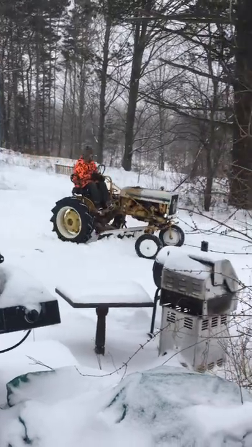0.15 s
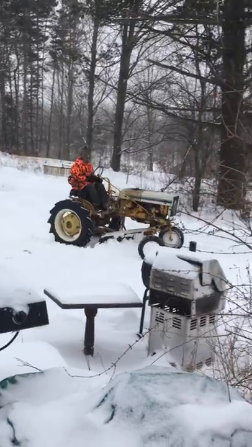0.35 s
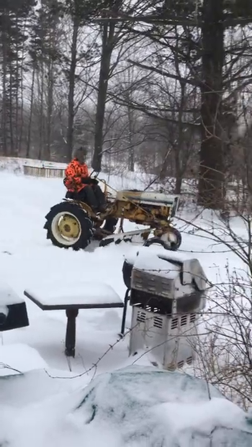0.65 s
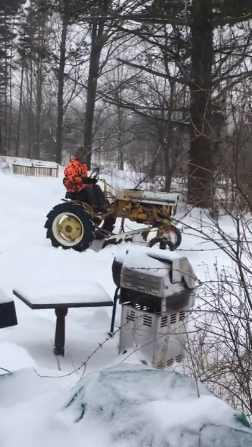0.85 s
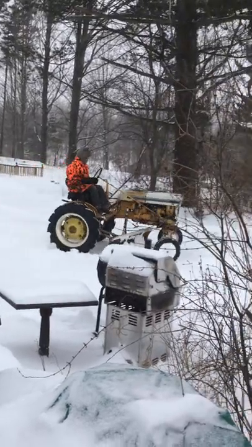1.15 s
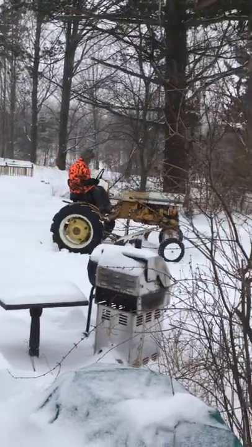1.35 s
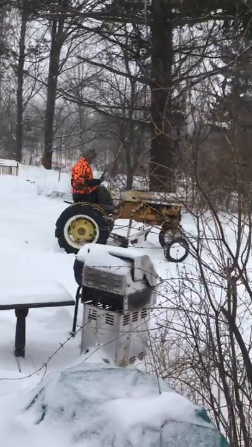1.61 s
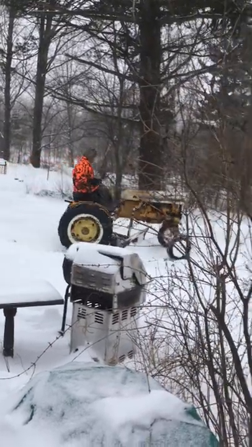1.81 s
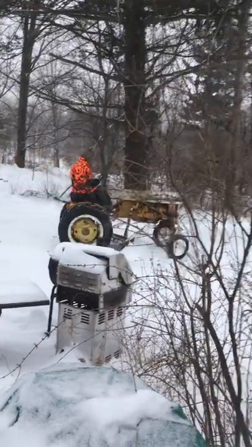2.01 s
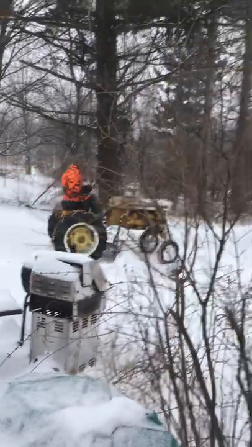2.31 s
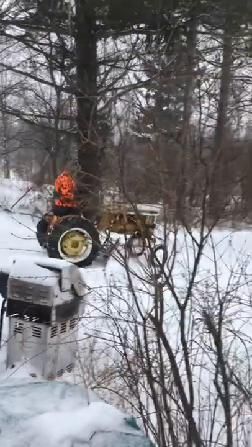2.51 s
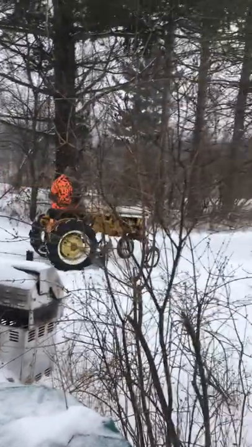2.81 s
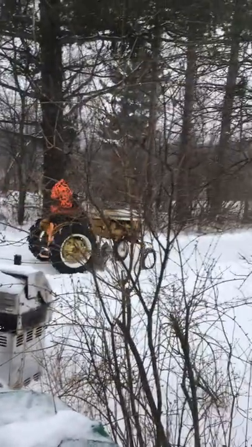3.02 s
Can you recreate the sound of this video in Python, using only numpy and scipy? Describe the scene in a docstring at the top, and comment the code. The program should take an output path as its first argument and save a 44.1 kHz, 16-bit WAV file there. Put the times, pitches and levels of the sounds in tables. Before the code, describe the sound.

An old tractor engine drones low and steady with a rough mid-range roar and faint hiss. Snow crunches softly; near the end a loose panel rattles quickly. Outdoors in a snowy yard, one microphone at some distance.

```python
"""A low engine drone fills a snowy yard: an old four-cylinder tractor drives slowly away, turning its
tail to the microphone. The exhaust is sines on multiples of the engine cycle, with fan sines beside it;
block and tinwork are shaped noise and noisy resonances. Snow crunches under the tyres as puffs of
filtered noise, gears whine as thin sines, and near the end a loose panel knocks in short gritty rings."""
import sys
import numpy as np
from scipy import signal
from scipy.fft import rfft, irfft
from scipy.io import wavfile
from scipy.ndimage import uniform_filter1d

SR = 44100
rng = np.random.default_rng(int(sys.argv[2]) if len(sys.argv) > 2 else 0)


def volts_from_decibels(level):
    """Turn decibel levels (scalar or array-like) into linear amplitude factors."""
    exponent = np.asarray(level, float) / 20
    return 10 ** exponent


def dump(signal):
    """Clip the signal to [-1, 1] and save it as 16-bit WAV at the path in sys.argv[1]."""
    limited = np.clip(np.atleast_2d(signal).T, -1, 1)
    pcm = np.round(limited * 32767).astype(np.int16)
    wavfile.write(sys.argv[1], SR, pcm)


N = 139356
T = np.arange(N) / SR
BLUR_TURNS = 0.0125  # rms phase wander per multiple: cycles are never quite alike
QUICK_HZ = 10  # rattle and flicker are no slower than this


def evened(x):
    """Scales to rms 1."""
    return x / np.sqrt(np.mean(x ** 2) + 1e-20)


def read(points, hz):
    """Reads a spectrum on a log-frequency axis, silent outside its points."""
    point_hz, level_db = np.transpose(points)
    return np.interp(np.log(hz + 1), np.log(point_hz + 1), level_db, -120, -120)


def drive(column, t=T):
    """One column of the drive across the yard, over time."""
    names = ["start_s", "turned_away", "firing_db", "octave_db", "roar_db", "low_mids_db"]
    # the tractor's course and loudness:
    # start_s, turned_away (0-1), firing_db, octave_db, roar_db, low_mids_db
    course = np.array([(0, 0.01, -37, -34, -2, 1), (.85, 0.15, -34.5, -33, -1.5, 0.5),
                       (1.15, 0.35, -35.5, -32.5, -1.5, 3), (1.75, 0.53, -35, -31.5, -0.5, 3.5),
                       (2.1, 0.61, -36.5, -31, -0.5, 3.5), (2.36, 0.63, -37, -30, 0.5, -1),
                       (2.5, 0.84, -37.5, -31.5, 1, 0), (3.16, 0.93, -39.5, -32.5, 1.5, -1.5)])
    return np.interp(t, course[:, 0], course[:, names.index(column)])


def facing(side_db, behind_db, t=T):
    """Blends from the side-on value to the value from behind as the tractor turns away."""
    away = np.clip(drive("turned_away", t), 0, 1)
    return side_db + (behind_db - side_db) * away


def waver(top_hz, low_hz=.7):
    """Random drift of rms 1, a sum of slow sines."""
    t = T[::64]
    slow = np.zeros(len(t))
    for hz in np.geomspace(low_hz, top_hz, num=14):
        slow += np.sin(2 * np.pi * (hz * t + rng.random())) / np.sqrt(hz)
    return np.interp(T, t, evened(slow))


def fuzzy(hz, width_hz, size=N):
    """Noise ringing in one steep resonance, rms 1."""
    radius, t = np.exp(-np.pi * width_hz / SR), np.arange(size) / SR
    noise = rng.standard_normal(size) + 1j * rng.standard_normal(size)
    # a double pole around 0 Hz, then shifted up to the resonance
    narrow = signal.lfilter([1], [1, -2 * radius, radius * radius], noise)
    return evened((narrow * np.exp(2j * np.pi * hz * t)).real)


def burst(rise_s, t60_s):
    """Soft rise, then exponential decay."""
    t = np.arange(SR // 5) / SR
    rise = np.sin(np.pi / 2 * np.minimum(t / rise_s, 1)) ** 2
    return rise * volts_from_decibels(-60 * np.maximum(t - rise_s, 0) / t60_s)


def add(mix, start_s, sound):
    """Mixes a sound in at a time."""
    part = mix[round(start_s * SR):][:len(sound)]
    part += sound[:len(part)]


def tone(turns, rms_db):
    """A sine of random phase at an rms level."""
    return np.sqrt(2) * volts_from_decibels(rms_db) * np.sin(2 * np.pi * (turns + rng.random()))


def crunches():
    """Short bright puffs of crushed snow: the loud ones listed, small ones at random."""
    # loud crunches under the tyres: peak_s, rms_db (at the peak)
    loud = [(.037, -53), (.131, -51), (.285, -50), (.525, -58), (.793, -52), (.88, -57), (1.336, -53),
            (1.81, -58), (2.04, -55), (2.291, -56)]
    # colour of crushed snow: pitch_hz, level_db (relative)
    snow_colour = [(2000, -36), (3200, -13.5), (5310, -1), (7130, -10.5), (10000, -16), (16000, -33)]
    rise_s, t60_s = .008, .14
    small_per_s, small_db, small_range_db = 25, -68, 5.9
    lumps_db = 3  # rms unevenness of each crunch's colour
    shape = burst(rise_s, t60_s)
    hz = np.fft.rfftfreq(len(shape), 1 / SR)
    draws = rng.random((round(small_per_s * N / SR), 2))
    small = [(when * N / SR, small_db + small_range_db * size) for when, size in draws]
    out = np.zeros(N)
    for peak_s, rms_db in list(loud) + small:
        lumps = lumps_db * evened(uniform_filter1d(rng.standard_normal(len(hz)), size=250))
        spectrum = rfft(rng.standard_normal(len(shape))) * volts_from_decibels(read(snow_colour, hz) + lumps)
        grit = evened(irfft(spectrum, len(shape)))
        add(out, max(peak_s - rise_s, 0), volts_from_decibels(rms_db) * shape * grit)
    return out


def whines():
    """Thin gear tones of wavering pitch that swell and fade."""
    # gear whines: start_s, length_s, pitch_hz, rms_db
    gears = [(1.66, .52, 1285, -54), (2.6, .6, 2606, -64), (2.36, .26, 3260, -64), (2.61, .165, 3260, -59)]
    pitch_waver_hz, level_waver_db, edge_s = 4, 1.4, .04
    out = np.zeros(N)
    for start_s, length_s, hz, rms_db in gears:
        edge = np.clip(np.minimum(T - start_s, start_s + length_s - T) / edge_s, 0, 1)
        turns = np.cumsum(hz + pitch_waver_hz * waver(30)) / SR
        out += edge * tone(turns, rms_db + level_waver_db * waver(21.1))
    return out


def knocks():
    """A loose panel swells into a short gritty ring and is damped at once."""
    # knocks of the panel: peak_s, peak_db (of the sine, before grit), pitch_hz
    panel = [(2.648, -42.5, 1590), (2.706, -45.5, 1744), (2.755, -43, 1485), (2.8, -41.5, 1590),
             (2.86, -37.5, 1590), (2.955, -39, 1585), (3.005, -41.5, 1563), (3.058, -35, 1590),
             (3.137, -39.5, 1616)]
    rise_s, t60_s = .02, .09
    grit_share, grit_width_hz = .5, 350  # noise rms against the sine's, and its bandwidth
    shape, out = burst(rise_s, t60_s), np.zeros(N)
    for peak_s, peak_db, hz in panel:
        ring = tone(hz * T[:len(shape)], 0)
        ring += grit_share * fuzzy(hz, grit_width_hz, size=len(shape))
        add(out, peak_s - rise_s, volts_from_decibels(peak_db) / np.sqrt(2) * shape * ring)
    return out


def roar_colour(hz, t):
    """Spectrum of the block's roar, hiss and rumble, turning with the tractor."""
    # mid roar heard from the side: pitch_hz, level_db (relative)
    side = [(195, -60), (215, -5), (294, -5.5), (360, -1), (394, -33), (430, -12), (560, 1), (671, -12),
            (750, -2.5), (850, -12.5), (930, -28.5), (1050, -12.5), (1300, -18), (1600, -10.5),
            (1700, -23.5), (1850, -18), (2060, -27.5), (2230, -21), (2450, -41), (2600, -70)]
    # mid roar heard from behind: pitch_hz, level_db (relative)
    behind = [(195, -55), (215, -1), (294, -5.5), (360, -9), (401, -12), (430, -15), (515, -10.5),
              (640, -13.5), (750, -12), (850, -14), (950, -27.5), (1300, -16), (1560, -17.5), (1900, -18.5),
              (2080, -31), (2230, -26.5), (2600, -66)]
    # treble hiss: pitch_hz, level_db (relative)
    hiss = [(1470, -43), (2500, -2.5), (3350, 0), (3970, -3), (5390, -2.5), (6050, -11), (7170, -14),
            (9600, -15.5), (10500, -21.5), (15700, -23)]
    # low rumble: pitch_hz, level_db (relative)
    rumble = [(20, -50), (42, -33), (58, -12.5), (100, -4.5), (170, -13.5), (215, -66)]
    hiss_db, rumble_db = -26.5, 1  # against the mid roar
    hiss_dulls_db = -3  # at 5 kHz, once fully turned away
    sag = 0.043  # the roar's resonances sink by this share as the tractor turns away
    boom_top_hz = 600  # the low-mid level acts below this
    sunk = hz[:, None] * facing(1, 1 + sag, t)
    colour = volts_from_decibels(facing(read(side, sunk), read(behind, sunk / (1 + sag)), t))
    colour *= volts_from_decibels((hz < boom_top_hz)[:, None] * drive("low_mids_db", t))
    dulling = facing(0, hiss_dulls_db * np.log2(hz / 5000 + 1)[:, None], t)
    colour += volts_from_decibels(read(hiss, hz)[:, None] + hiss_db + dulling)
    colour += volts_from_decibels(read(rumble, hz) + rumble_db)[:, None]
    return colour


def block():
    """Roar of the block: patchy noise laced with thin lingering strands, rms 1."""
    patchy_db, strands_db = .8, 1.5  # rms unevenness
    frames, hz = N // 512 + 5, np.fft.rfftfreq(2048, 1 / SR)
    real, imaginary, patches, strands = rng.standard_normal((frames, 1025, 4)).T
    # smoothed over frequency, then over time: strands are narrow and long, patches broad and short
    strands = evened(uniform_filter1d(uniform_filter1d(strands, size=2, axis=0), size=40, axis=1))
    patches = evened(uniform_filter1d(uniform_filter1d(patches, size=14, axis=0), size=5, axis=1))
    colour = roar_colour(hz, np.arange(frames) * 512 / SR)
    unevenness = volts_from_decibels(patchy_db * patches + strands_db * strands)
    spectrum = (real + 1j * imaginary) * colour * unevenness
    return evened(signal.istft(spectrum, nperseg=2048, noverlap=1536)[1][:N])


def tinwork():
    """Sheet metal rings with the shaking: noisy resonances whose levels rattle."""
    # ringing tinwork: pitch_hz, width_hz, side_db, behind_db (before the roar's level is applied)
    tin = [(1590, 51, -55, -60.5), (1768, 21, -85, -58), (2222, 74, -63, -68), (3283, 270, -59.5, -71),
           (6490, 520, -64.5, -78.5), (8460, 300, -73, -85.5)]
    rattle_db = 2.2
    out = np.zeros(N)
    for hz, width_hz, side_db, behind_db in tin:
        level = volts_from_decibels(facing(side_db, behind_db) + rattle_db * waver(50, QUICK_HZ))
        out += level * fuzzy(hz, width_hz)
    return out


def roar():
    """Block and tinwork together, flickering under one changing level."""
    block_db, flicker_db = -39, .5  # block level before the drive's roar level
    level = volts_from_decibels(drive("roar_db") + flicker_db * waver(25, QUICK_HZ))
    return (volts_from_decibels(block_db) * block() + tinwork()) * level


def fan(firings):
    """Belt-driven blades hum off the engine's own series."""
    # fan hum: multiple (of its turning rate), side_db, behind_db
    blades = [(2, -59, -71), (4, -44, -41), (8, -45.5, -50.5), (12, -54.5, -56.5), (16, -58, -57)]
    turns_per_firing, waver_db = .5965, 1.5
    out = np.zeros(N)
    for multiple, side_db, behind_db in blades:
        turns = multiple * (turns_per_firing * firings + BLUR_TURNS * waver(12))
        out += tone(turns, facing(side_db, behind_db) + waver_db * waver(9))
    return out


def exhaust(firings):
    """Firing tone and octave, locked together; uneven cylinders add the cycle's other multiples."""
    # weaker multiples of the four-firing cycle: multiple, side_db, behind_db (before the low-mid level)
    uneven = [(6.1, -52.5, -53), (9.98, -56.5, -55), (11.93, -55, -45.5), (14.95, -55.5, -50.5),
              (16.09, -69, -50), (17.1, -59.5, -49.5), (18.41, -61, -45.5), (20.19, -53.5, -51)]
    firing_waver_db, cycle_waver_db = 0.03, 2
    firing_level = volts_from_decibels(drive("firing_db") + firing_waver_db * waver(6))
    octave_level = volts_from_decibels(drive("octave_db") + firing_waver_db * waver(6.8))
    out = np.sqrt(2) * firing_level * np.cos(2 * np.pi * firings)
    out -= np.sqrt(2) * octave_level * np.cos(4 * np.pi * firings)
    for multiple, side_db, behind_db in uneven:
        turns = multiple * (firings / 4 + BLUR_TURNS * waver(12))
        level_db = facing(side_db, behind_db) + drive("low_mids_db") + cycle_waver_db * waver(7)
        out += tone(turns, level_db)
    return out


def engine_firings():
    """Running count of firings, the clock that exhaust and fan share."""
    # engine speed: start_s, firings_per_s
    speed = [(0, 60), (.27, 60.2), (.4, 60.55), (.85, 60.85), (1.1, 59.45), (1.42, 60.3), (1.7, 59.7),
             (2.15, 59.25), (2.36, 59.7), (2.395, 62), (2.43, 60.2), (2.8, 60.2), (3.16, 60.6)]
    return np.cumsum(np.interp(T, *np.transpose(speed))) / SR


def scene():
    """The tractor and the snow, at one microphone."""
    firings = engine_firings()
    ground = crunches()
    machine = whines() + knocks() + roar() + fan(firings) + exhaust(firings)
    return (ground + machine)[None]


def roll_off(x):
    """The treble ends steeply here."""
    return signal.sosfilt(signal.butter(12, 16470, fs=SR, output="sos"), x)


def record(dry):
    """A steep low-pass limits the band of the finished mix."""
    edge_hz = 15780
    lowpass = signal.firwin(1023, edge_hz, window=("kaiser", 9), fs=SR)
    limited = signal.oaconvolve(dry, lowpass[None], "same")
    return roll_off(limited)


dry = scene()
out = record(dry)
dump(out)
```